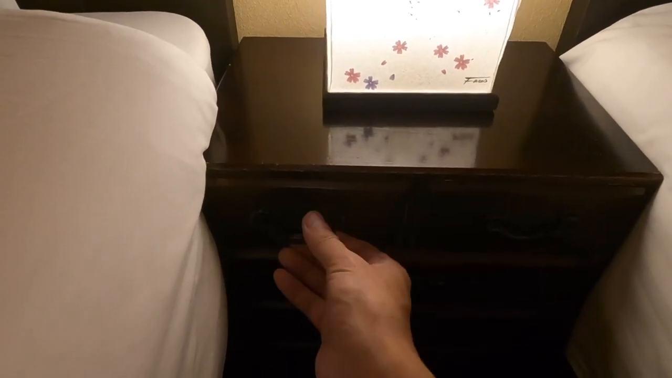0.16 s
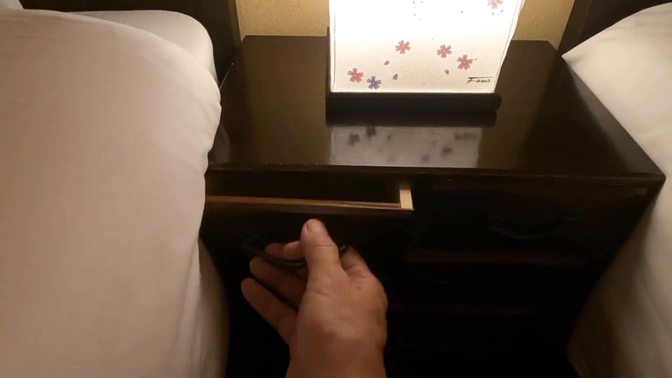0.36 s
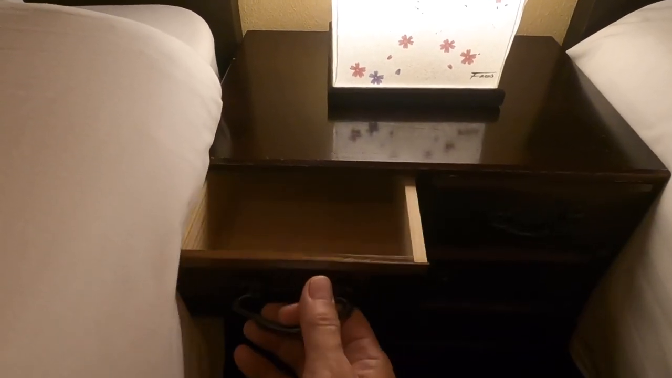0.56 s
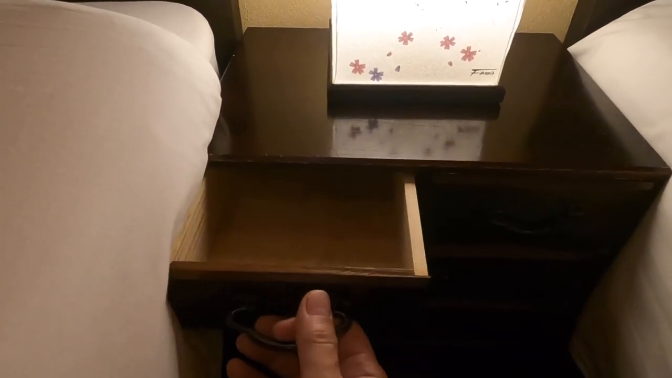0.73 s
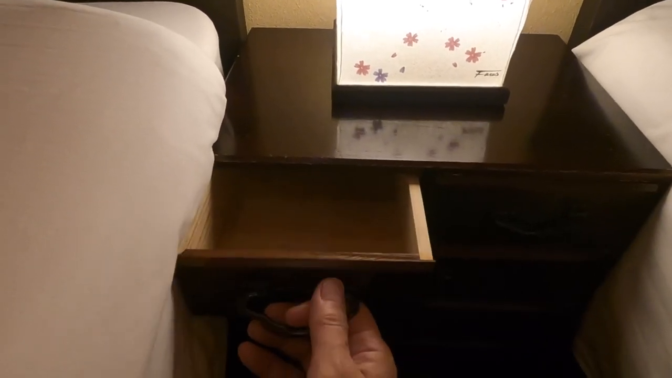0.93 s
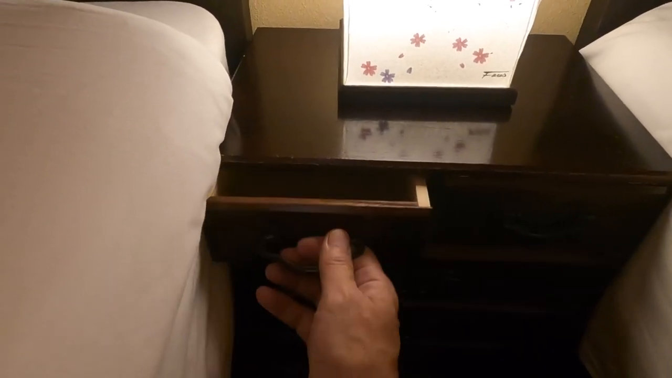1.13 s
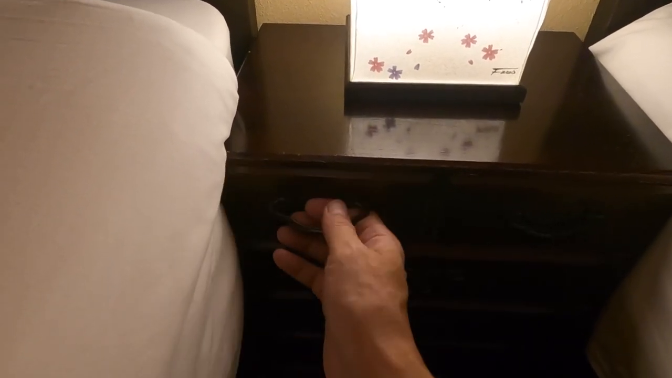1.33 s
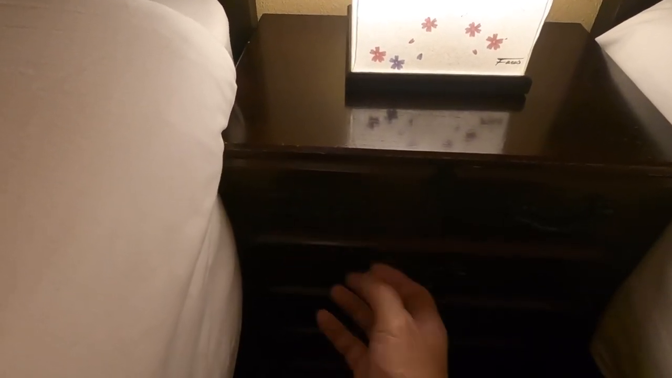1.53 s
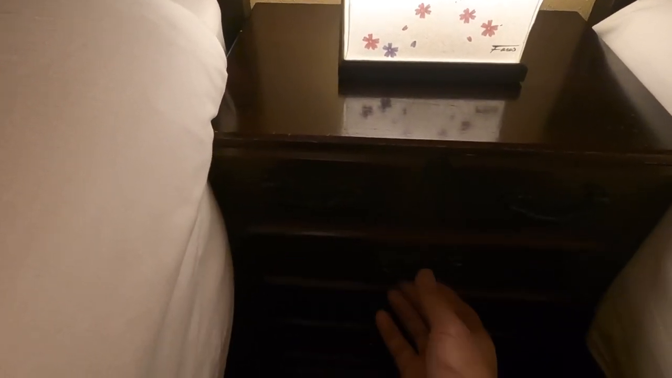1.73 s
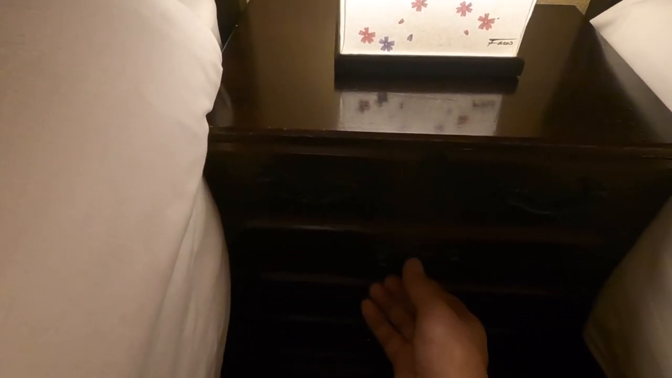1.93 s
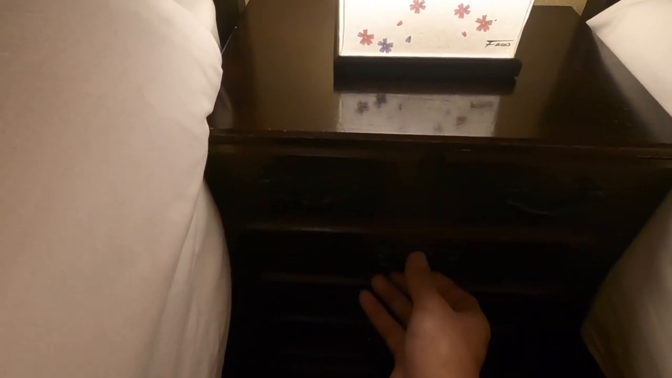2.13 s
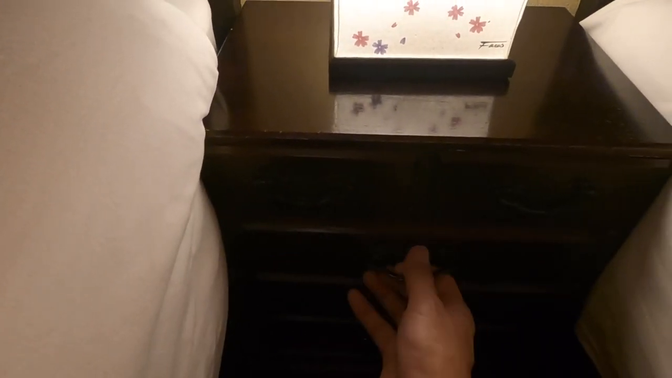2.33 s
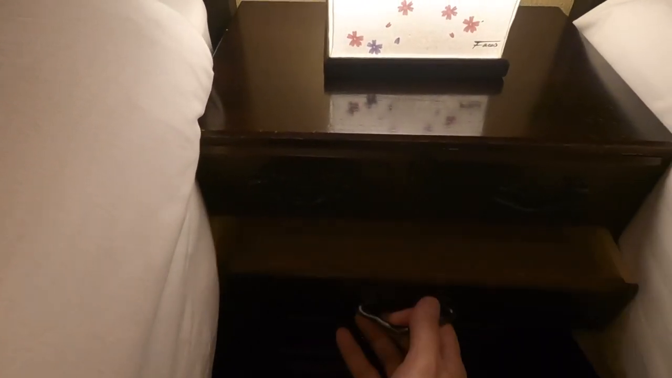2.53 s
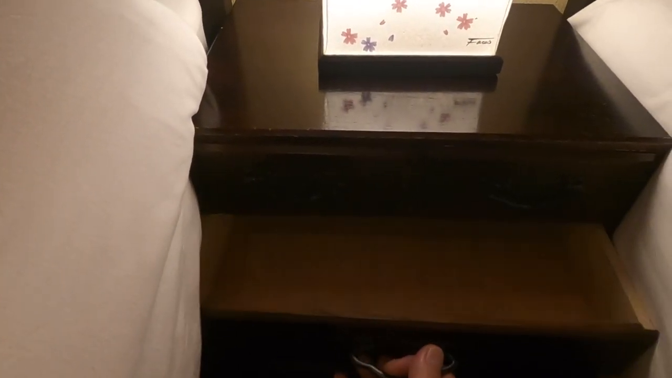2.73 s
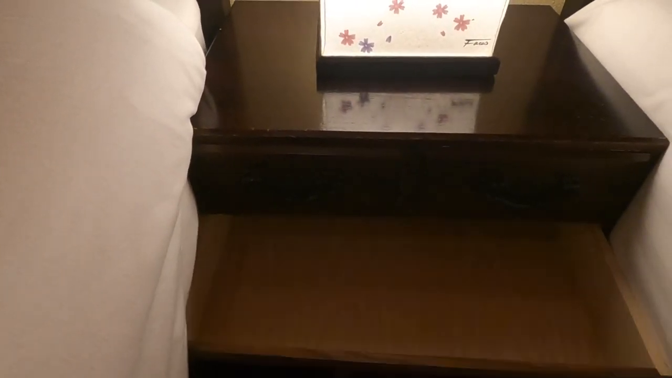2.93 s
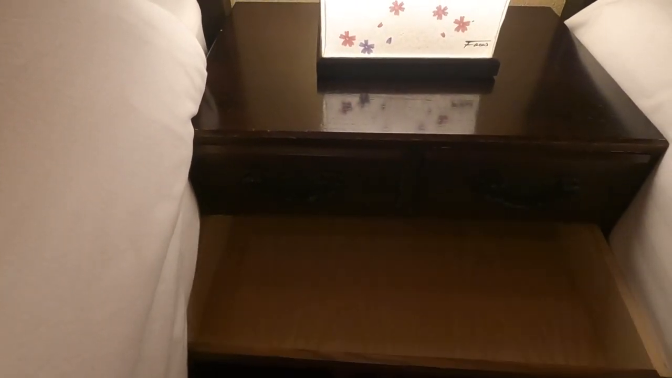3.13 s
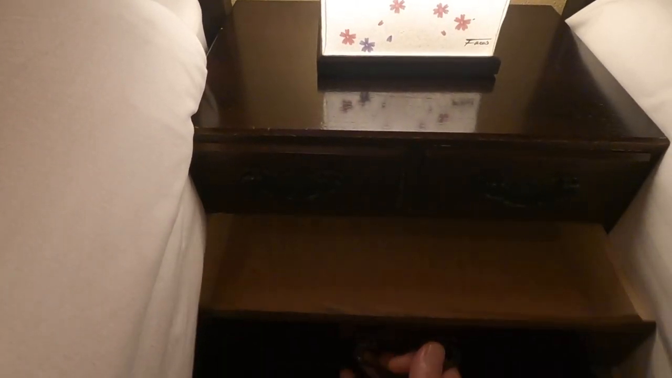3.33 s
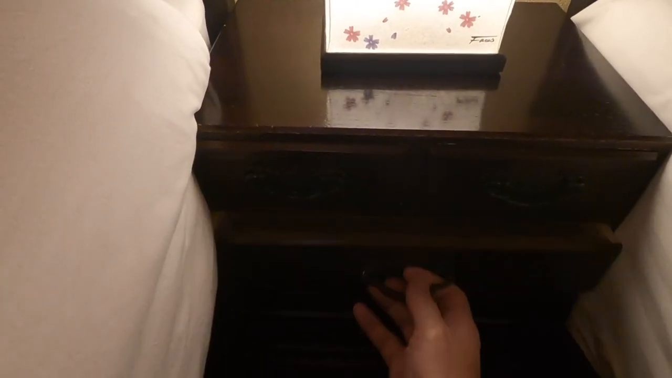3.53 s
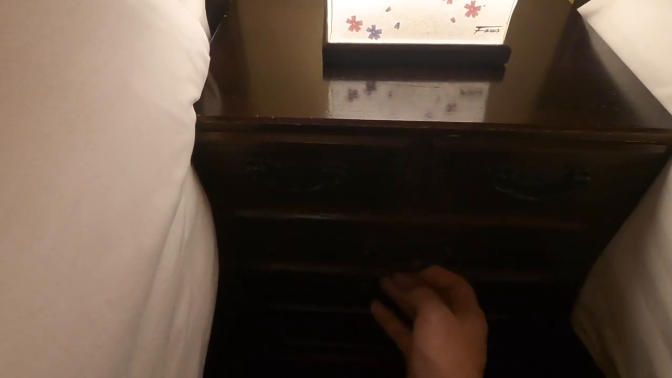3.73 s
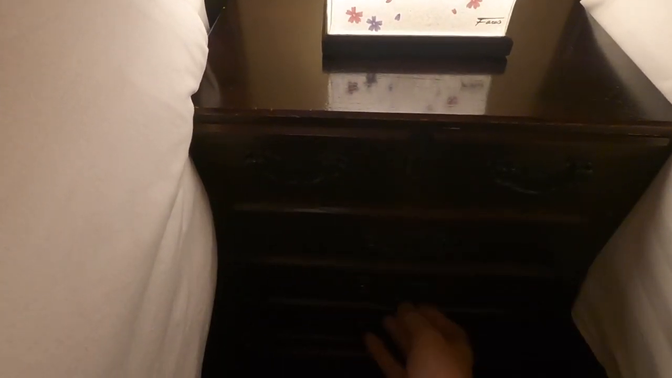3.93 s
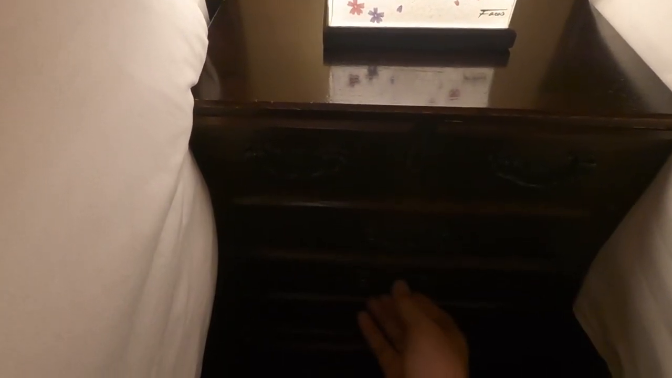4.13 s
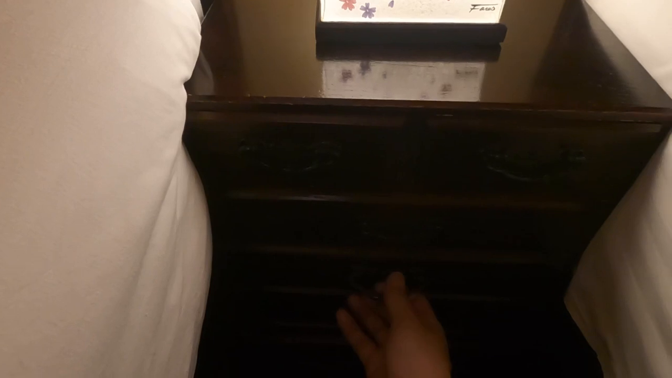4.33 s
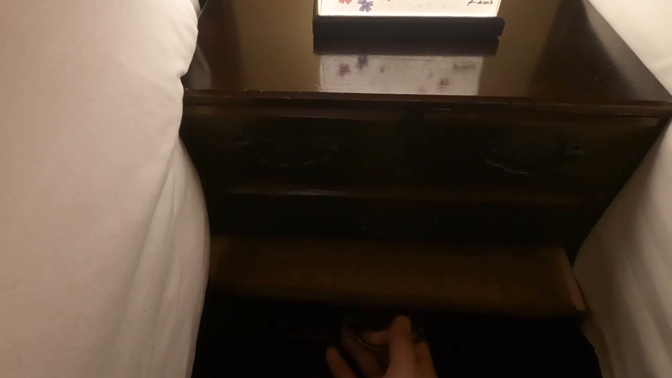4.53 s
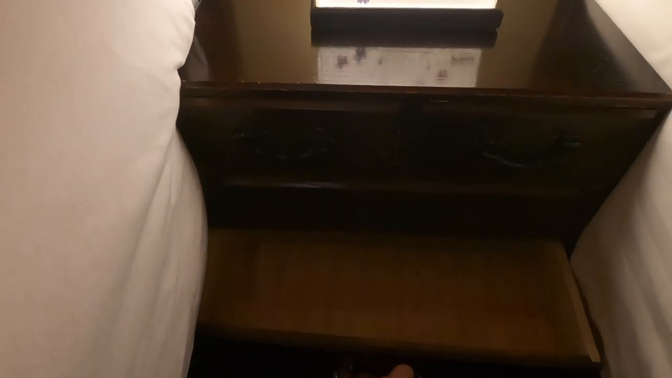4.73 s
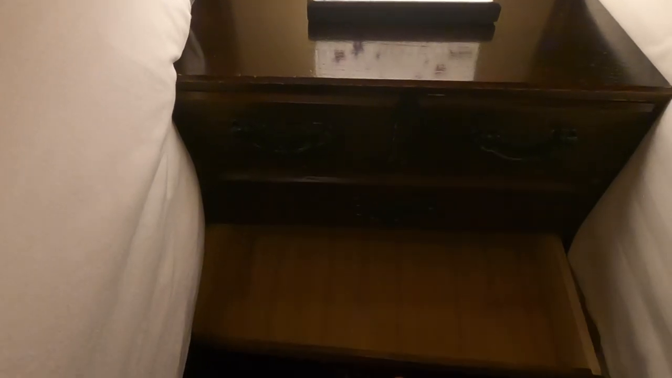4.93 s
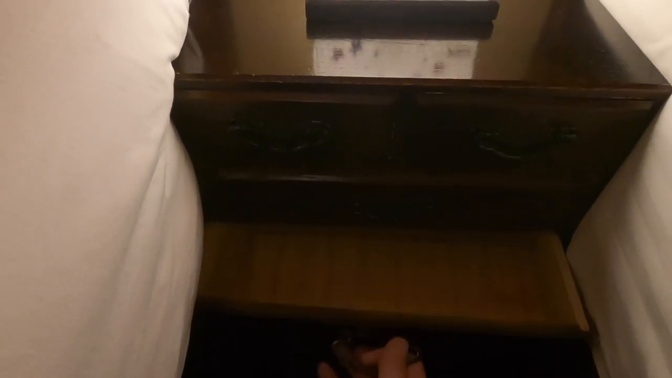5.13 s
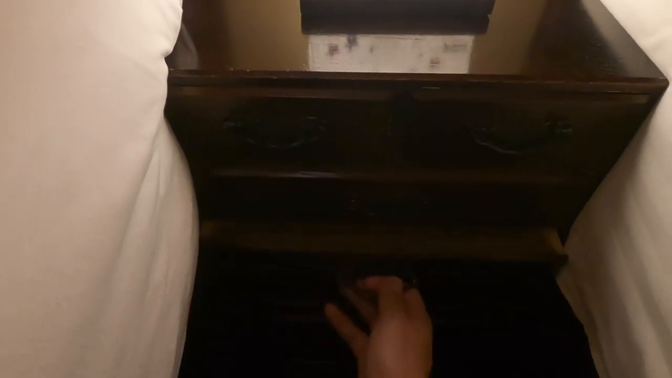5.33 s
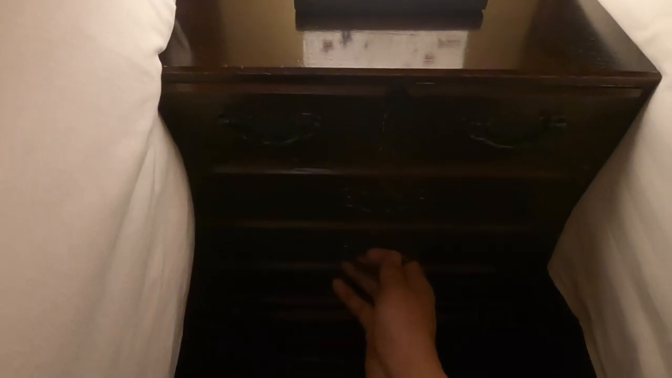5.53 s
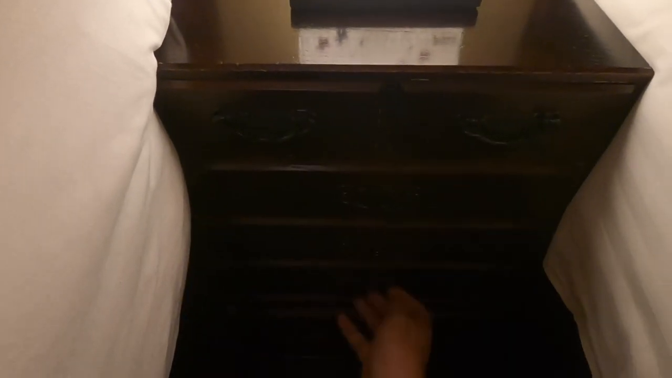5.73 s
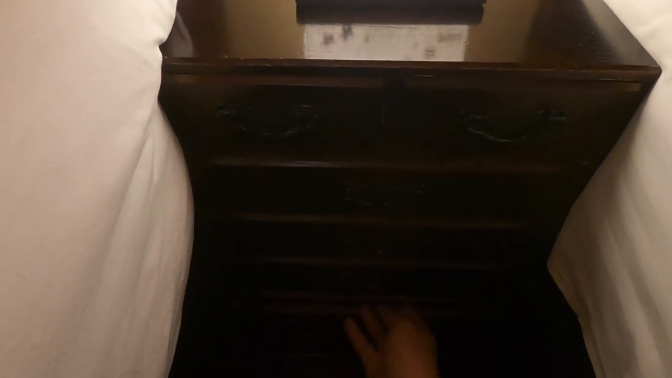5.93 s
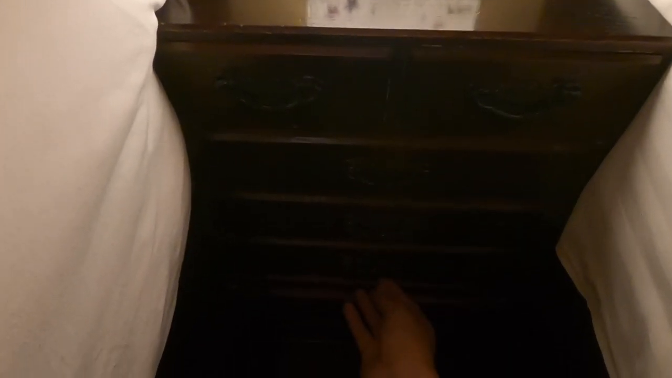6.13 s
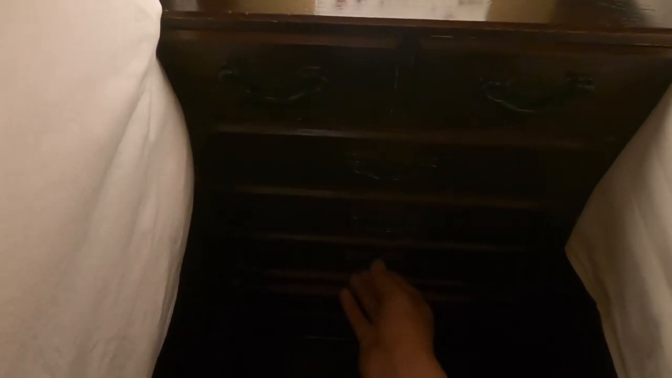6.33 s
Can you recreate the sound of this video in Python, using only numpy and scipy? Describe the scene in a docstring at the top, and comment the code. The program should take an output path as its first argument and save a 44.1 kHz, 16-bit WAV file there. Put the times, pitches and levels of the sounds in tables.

```python
"""Three wooden drawers of a bedside chest, close to the microphone, slide out and in, one after another.
Grain slipping on wooden runners shakes the boxes; wood sticks in short creaks, groans and a falling squeak.
Struck wood and drawer floors thud and knock as dying modes; metal bail handles crack, clatter and ring.
Fingers and a sleeve scuff as clumped sprays of tiny slips.
A small, soft, quiet room answers briefly, over still air and a faint unsteady rumble."""
import sys
import numpy as np
from scipy import signal
from scipy.fft import rfft, irfft, next_fast_len
from scipy.io import wavfile
from scipy.ndimage import uniform_filter1d, map_coordinates

SR = 44100
rng = np.random.default_rng(int(sys.argv[2]) if len(sys.argv) > 2 else 0)


def inscribe(sig):
    """Save sig as 16-bit PCM at rate SR to the path in sys.argv[1].

    A 1-D sig is mono; a 2-D sig holds one channel per row.
    Samples are clipped to [-1, 1] before scaling.
    """
    pcm = np.round(np.clip(np.atleast_2d(sig).T, -1, 1) * 32767)
    wavfile.write(sys.argv[1], SR, pcm.astype(np.int16))


N = 285327
TIME = np.arange(N) / SR  # s

# Still air of the room, relative spectrum: [f/Hz, density/dB per Hz]
AIR = [(10, -3), (29, 10.5), (45, -4), (250, -12.5), (500, -29), (2000, -35.5), (7000, -43.5), (10000, -54),
       (13000, -54), (15000, -102)]
# Faint low rumble, relative spectrum: [f/Hz, density/dB per Hz]
HANDLING_COLOUR = [(30, -13), (70, 14.5), (120, -5), (220, 0), (350, -5.5), (700, -38), (2000, -54)]
AIR_DB, HANDLING_DB = -53, -62  # the rumble wavers about its level
# Decay of the room's tail: [f/Hz, t60/s]
ROOM_T60 = [(100, 0.27), (500, 0.46), (2000, 0.45), (6000, 0.33), (12000, 0.37)]

# Gain of the difference between the two microphone ports: [f/Hz, gain/dB]
WIDTH = [(60, -21), (150, -15), (400, -4), (2000, 2), (5000, 0), (9000, 6)]
# Balance of the ports: [f/Hz, left minus right/dB]
LEAN = [(150, 0), (280, -1.2), (600, -2.1), (1800, -1.8), (4500, -.4), (10000, -.8)]
# Phase between the ports: [f/Hz, lead of the left/rad]
LEAD = [(170, 0), (600, .24), (1400, .27), (3200, -.4), (8000, -.45), (12000, -.1)]
EDGE_HZ = 15200  # top of the band

# Short rubs of fingers, sleeve, handles and loose wood:
# [t/s, length/s, level/dB, centre f/Hz, spread/octaves]
SCUFFS = [(0.0, 0.072, -44.5, 250, 1.8), (1.515, 0.048, -37, 1300, 0.46), (1.78, 0.12, -52, 600, 2.9),
          (1.898, 0.05, -53, 3500, 2.4), (1.962, 0.038, -35, 1300, 1.2), (2.048, 0.035, -51.5, 4250, 1.2),
          (2.068, 0.034, -39.5, 880, 1.47), (2.381, 0.044, -30, 1700, 1.05),
          (3.267, 0.023, -41, 1600, 0.76), (3.573, 0.084, -39, 2500, 0.95), (5.625, 0.12, -46.5, 1200, 1.1),
          (5.872, 1, -64, 2720, 2.6), (5.968, 0.086, -53, 280, 0.85), (6.115, 0.064, -47.5, 2050, 1.34),
          (6.16, 0.082, -53.5, 332, 0.93), (6.222, 0.073, -61.5, 2470, 1.8)]
SCUFF_RISE, SCUFF_FADE_DB = 0.16, -19.5  # build-up as a share of the length; fall over one length

# Dry snaps of a handle's pivot: [t/s, level of the first 2.5 ms/dB, centre f/Hz, spread/octaves]
SNAPS = [(0.5628, -28.5, 3060, 1.5), (1.517, -42.5, 5500, 0.31), (1.6143, -23.5, 4400, 0.84),
         (3.887, -32, 6300, 0.6), (3.894, -31.5, 6000, 0.62), (4.4612, -35, 7100, 0.17),
         (5.5415, -28, 2600, 0.61), (6.41, -51, 4800, 1.7)]
# Modes of a bail handle on its plate, before grip and damping: [f/Hz, level/dB, t60/s]
BAIL = [(871, -3.5, 0.14), (1091, -3, 0.11), (1300, -7.5, 0.085), (1600, 2, 0.064), (1910, 10, 0.019),
        (2630, -20, 0.03), (3770, -10.5, 0.081)]
# Clacks of the handles:
# [t/s, reference level/dB, treble against it/dB, ring of the struck spot f/Hz, number of strikes]
CLACKS = [(0.103, -35.5, -22, 1450, 1), (0.21, -22.5, -14.5, 1330, 1), (0.245, -28.5, -23, 1660, 1),
          (0.3, -30, -20, 1640, 1), (0.315, -20.5, -16, 1610, 1), (0.326, -27.5, -23, 1600, 1),
          (0.333, -26, -24, 1100, 1), (0.341, -21, -16.5, 1630, 1), (0.368, -24, -15, 1800, 1),
          (1, -19, -20, 1680, 1), (1.356, -24.5, -10, 1710, 2), (1.463, -25, -16, 1600, 1),
          (1.526, -25, -21, 1192, 1), (1.553, -39.5, -22.5, 1300, 1), (1.614, -27.5, -18.5, 1300, 1),
          (1.763, -41.5, -20, 1680, 1), (1.956, -28, -16.5, 1690, 2), (2.178, -41, -23, 1660, 1),
          (2.228, -22.5, -13, 1600, 1), (2.3495, -22, -9, 1360, 1), (2.358, -19.5, -19, 1730, 1),
          (2.368, -20.5, -14, 2270, 1), (2.398, -29, -29.5, 980, 1), (2.454, -28.5, -18, 1770, 1),
          (3.421, -29.5, -11.5, 1670, 1), (3.49, -24, -20, 1980, 1), (3.558, -27.5, -32, 1680, 1),
          (3.694, -18, -15.5, 2630, 3), (3.786, -25.5, -17.5, 1840, 1), (3.884, -27, -21.5, 1700, 1),
          (4.094, -41.5, -22.5, 1680, 1), (4.141, -42, -15, 1360, 2), (4.259, -26.5, -17, 1810, 1),
          (4.322, -24, -11.5, 2350, 2), (4.332, -22, -26, 2160, 1), (4.395, -21, -16, 1740, 1),
          (4.463, -26, -12, 1550, 1), (5.014, -42, -24.5, 1120, 1), (5.5407, -19, -17.5, 1570, 1),
          (5.66, -28, -26, 1220, 1), (5.802, -35.5, -17.5, 1680, 1), (6.316, -48, -14, 1300, 1)]
# Clatter of a clack, relative spectrum: [f/Hz, density/dB per Hz]
CLACK_COLOUR = [(300, 9), (700, 0.5), (900, 14), (1600, 6.5), (2700, -1.5), (3700, -5), (5200, -10),
                (7500, -13.5), (9000, -24), (12000, -31), (15000, -60)]
CLACK_T60_S, CLACK_SHORTENING_PER_DB = 0.059, 0.1384  # the brighter the hit, the shorter its clatter
REBOUND_S, REBOUND_DB = 0.0187, -0.5  # a swinging bail strikes again, each time weaker

# Modes of a drawer's thin floor, before tilt and chance detuning: [f/Hz, level/dB, t60/s]
PANEL = [(210, -11.5, 0.11), (478, 3, 0.083), (562.5, -1, 0.1), (927, 2, 0.047), (1034, -4.5, 0.047),
         (1670, -18, 0.055), (2050, -22, 0.071)]
# A drawer tips or catches on its stop: [t/s, level of the first 25 ms/dB, tilt/dB per octave]
CATCHES = [(0.4714, -30.5, 1.5), (0.5, -34, 7), (0.9958, -30.5, -1), (2.931, -32.5, -8.5),
           (4.601, -31.5, 7.5), (4.8573, -25.5, 1)]
# Modes of the chest and its panels, before blow, detuning and ring factor: [f/Hz, level/dB, t60/s]
WOOD = [(68.9, 1.5, 0.51), (79.7, 1.5, 0.21), (93.2, 3.5, 0.24), (111.4, -1.5, 0.3), (140.4, -2.5, 0.097),
        (182.8, 5.5, 0.18), (220, 0.5, 0.15), (247.4, -7.5, 0.11), (287, 0, 0.18), (337.1, -5.5, 0.25),
        (400, -9, 0.12), (470.3, -3, 0.076), (518, -10.5, 0.048), (586.7, -13.5, 0.15), (670, -21.5, 0.22),
        (890, 4.5, 0.036), (921, 2, 0.048), (1050, 2, 0.032), (1234, -2, 0.08), (1480, 5, 0.02),
        (1680, -1, 0.1), (2410, -11.5, 0.035), (3400, -6, 0.03)]
# Wood strikes wood, then the drawer's weight lands: [t/s, strike level/dB, strike f/Hz,
# strike spread/octaves, thud level/dB, thud f/Hz, ring of the thud/factor on t60]
KNOCKS = [(0.102, -43.5, 228, 1.3, -41.5, 123, 0.73), (0.222, -38, 276, 2.1, -38, 111, 3),
          (0.275, -47, 200, 1.3, -41, 118, 1.8), (0.996, -28, 490, 0.71, -30, 119, 0.59),
          (1.119, -41, 250, 1.6, -39.5, 127, 0.78), (1.352, -24.5, 417, 2.04, -25.5, 98, 1.14),
          (1.366, -28, 600, 1.3, -30, 201, 0.8), (1.394, -38.5, 344, 1.2, -30.5, 79.5, 1.17),
          (1.447, -38, 430, 1.45, -36.5, 127, 0.64), (1.617, -47, 330, 1.2, -52, 220, 1.2),
          (1.898, -46.5, 286, 0.69, -38, 206, 1.4), (1.95, -28, 328, 1.67, -25.5, 170, 0.82),
          (1.975, -31, 400, 1.1, -36, 70, 2.3), (2.076, -27, 219, 0.76, -34, 67.3, 1.7),
          (2.253, -36, 210, 1.37, -40.5, 114.4, 6.5), (2.367, -21, 238, 2.64, -29, 84, 0.97),
          (2.391, -30.5, 500, 1.2, -25.5, 190, 1.33), (2.423, -34, 300, 0.79, -34, 132, 1),
          (2.534, -28, 564, 1.34, -28.5, 267.7, 0.97), (2.55, -30.5, 560, 1.14, -38, 226, 0.71),
          (2.942, -28.5, 428, 0.46, -36, 147, 1.3), (3.55, -28, 504, 1.3, -30, 176, 4),
          (3.569, -32, 237, 1, -25.5, 80, 1.08), (3.589, -33.5, 420, 1.5, -39, 128, 1.3),
          (3.651, -38.5, 298, 1.9, -37, 150, 1.2), (3.692, -30, 262, 0.58, -21, 85.5, 0.83),
          (3.713, -33, 600, 1.3, -31, 149.6, 1.3), (3.745, -33.5, 228, 0.65, -47, 83.5, 0.8),
          (4.35, -37.5, 225, 1.6, -41.5, 148, 3.1), (4.6, -22.5, 296, 0.92, -37, 220, 0.7),
          (4.885, -36.5, 298, 1.04, -35.5, 170, 1.56), (5.517, -36.5, 1390, 1.2, -40, 230, 1.1),
          (5.528, -34.5, 270, 1.3, -22, 80, 0.55), (5.65, -46.5, 305, 1.5, -29.5, 113, 1.07),
          (5.943, -61.5, 600, 1.1, -59, 202, 1), (6.412, -54.5, 227, 0.64, -48, 130, 0.61)]
LANDING_S, STRIKE_RING, THUD_SPREAD_OCTAVES = 0.00809, 1, 0.5

# The bottom drawer wedges shut with a falling squeak:
# [t/s, pitch before a chance offset f/Hz, level/dB]
SQUEAK = [(5.511, 2164, -30), (5.513, 1810, -31), (5.518, 1050, -30), (5.522, 704, -25),
          (5.533, 647, -29.5)]
# Creaks, groans and chirps of sticking wood: [t/s, length/s, slip rate at the start/per s,
# slip rate at the end/per s, level/dB, brightness f/Hz]
CREAKS = [(0.383, 0.11, 146, 134, -34.5, 152), (0.448, 0.021, 180, 170, -40, 600),
          (0.471, 0.052, 106, 132, -29.5, 148), (0.499, 0.022, 314, 265, -32.5, 1130),
          (0.506, 0.029, 256, 170, -26, 360), (3.304, 0.037, 1380, 1370, -36, 1370),
          (3.325, 0.018, 400, 420, -31, 430), (3.354, 0.0186, 450, 475, -29, 600),
          (3.413, 0.047, 495, 430, -34.5, 445), (4.536, 0.021, 1700, 1260, -40, 1700),
          (4.606, 0.037, 208, 174, -36, 255)]
# A drawer skews and binds on its runners: [t/s, rise/s, length/s, release/s,
# mean extra scrape when fully bound/dB, level of its jerks before scatter/dB]
BINDS = [(2.931, 0.0049, 0.019, 0.028, 9, -40.5), (3.277, 0.037, 0.14, 0.011, 8, -40.5),
         (3.542, 0.0025, 0.038, 0.046, 2.5, -40), (4.512, 0.095, 0.09, 0.0074, 6, -52)]
BIND_GRIT, BIND_RUMBLE = 0.18, 0.29  # of a bind's added dB: share that flutters; share in the rumble
JERKS_PER_S, JERK_HZ, JERK_SCATTER_OCTAVES = 72, 666, 0.91
JOLTS_PER_S, JOLT_HZ, JOLT_DB = 11, 170, -4.5  # bumps in the runners; level against the rumble

# Out then in for each drawer; levels at full speed, before binding, easing and judder:
# [start t/s, up to speed t/s, slows t/s, rests t/s, hiss of the runners level/dB,
# rasp of the box level/dB, rumble level/dB, easing of the load over the run/dB]
STROKES = [(0.30, 0.51, 0.72, 0.8, -44.5, -39, -36, 6), (0.909, 1.049, 1.33, 1.386, -48.5, -44, -44, 3),
           (2.41, 2.565, 3.025, 3.1, -48.3, -49.5, -51, 0),
           (3.205, 3.273, 3.48, 3.964, -47, -43.5, -49.5, 0.5),
           (4.409, 4.547, 4.775, 5.053, -43.5, -40.5, -39, 4),
           (5.027, 5.281, 5.52, 5.56, -44, -40, -52.5, 7)]
# Scrape of the top drawer, relative spectrum: [f/Hz, density/dB per Hz]
SCRAPE_TOP = [(35, -39), (60, -8), (102, 5.5), (155, -13), (214, -5), (355, -2.5), (448, -4.5), (744, -5),
              (1050, -14), (1750, -21), (5820, -26.5), (11900, -47), (15000, -63)]
# Scrape of the middle drawer on the way out, relative spectrum: [f/Hz, density/dB per Hz]
SCRAPE_MIDDLE = [(35, -9), (60, 7.5), (170, -9), (204, 4), (246, -15), (469, 10), (711, 3.5), (960, 6),
                 (1600, -8), (1880, -12.5), (3580, -15), (11900, -40.5), (15000, -65)]
# Scrape of the middle drawer as it binds on the way in, relative spectrum: [f/Hz, density/dB per Hz]
SCRAPE_BINDING = [(35, -49), (60, -6), (162, -4), (251, -19), (458, -7), (762, -7.5), (916, -32),
                  (1010, -15), (1710, -23), (2150, -24), (2360, -17), (2600, -28), (2850, -17), (4500, -19),
                  (5500, -20), (6500, -26.5), (12200, -41.5), (15000, -62)]
# Scrape of the bottom drawer, relative spectrum: [f/Hz, density/dB per Hz]
SCRAPE_BOTTOM = [(35, -43), (60, 12), (148, -3), (224, -5.5), (418, -2.5), (564, 4.5), (711, -10.5),
                 (916, -1), (2060, -23.5), (3660, -23), (7500, -38), (12500, -52.5), (15000, -76.5)]
# Resonances of the top drawer's box, relative levels before drift: [f/Hz, width/Hz, level/dB]
BOX_TOP = [(460, 71, 6.5), (1170, 480, -4)]
# Resonances of the middle drawer's box, likewise: [f/Hz, width/Hz, level/dB]
BOX_MIDDLE = [(439, 125, 3.5), (940, 30, -3), (1460, 70, -6), (1690, 50, -6), (2360, 100, -9.5),
              (3570, 230, -20), (5330, 1000, -16)]
# Resonances of the bottom drawer's box, likewise: [f/Hz, width/Hz, level/dB]
BOX_BOTTOM = [(213.5, 22, 10), (600, 71, 4), (930, 19, 6), (1550, 240, -7), (2384, 130, -11.5),
              (3500, 170, -16.5), (5530, 1500, -26.5)]
SPEED_DB_PER_DECADE = 29  # the scrape grows with the speed of the drawer
RASP_EASING, RUMBLE_EASING = 1.63, 1.1  # the box feels the easing load more than the runners do


def amp(db):
    """Decibels to gain."""
    return 10 ** (np.asarray(db) / 20)


def unit(x):
    """Scales to rms 1."""
    return x / np.sqrt(np.mean(x ** 2) + 1e-20)


def read(points, hz):
    """Reads a table on a log-frequency axis."""
    f, value = np.transpose(points)
    return np.interp(np.log(hz + 1), np.log(f + 1), value)


def swell(s, db):
    """Gain along a level curve, fading to -120 dB outside it."""
    return amp(np.interp(TIME, np.r_[s[0] - .02, s, s[-1] + .03], np.r_[-120, db, -120]))


def shape(x, gain):
    """Filters by a gain given as a function of frequency."""
    size = next_fast_len(x.shape[-1] + 2048)
    spectrum = rfft(x, size) * gain(np.fft.rfftfreq(size, 1 / SR))
    return irfft(spectrum, size)[..., :x.shape[-1]]


def below(hz, edge_hz, order=8):
    """Low-pass gain."""
    return 1 / np.sqrt(1 + (hz / edge_hz) ** order)


def above(hz, edge_hz):
    """The matching high-pass gain."""
    return np.sqrt(1 - below(hz, edge_hz) ** 2)


def noise(colour, count=N):
    """Noise of a given spectrum at rms 1."""
    return unit(shape(rng.standard_normal(count), lambda hz: amp(read(colour, hz))))


def waver(per_s):
    """Slow chance at rms 1: straight lines between 4096 random knots, then the last one held."""
    knots = rng.standard_normal(4096)
    return unit(np.interp(TIME * per_s, np.arange(len(knots)), knots))


def add(mix, s, sound):
    """Mixes a sound in at a time."""
    part = mix[max(round(s * SR), 0):][:len(sound)]
    part += sound[:len(part)]


def scattered(start, length, per_s):
    """Unevenly spaced moments, at most 24, each with two chance values: rows (s, chance, chance)."""
    draws = rng.random((24, 3))
    s = start + (np.arange(len(draws)) + draws[:, 0]) / per_s
    return np.c_[s, 2 * draws[:, 1:] - 1][s < start + length]


def ring(modes, t, weight=1, hold=1, in_step_hz=330):
    """Dying sines: each blow lands on another spot, so high modes differ in phase, the lowest less."""
    hz, db, t60 = np.transpose(modes)[:, :, None]
    phase = rng.random() + rng.uniform(-0.55, 0.54, hz.shape) * np.minimum(hz / in_step_hz, 1)
    decay = amp(db - 60 * t / (t60 * hold))
    return (weight * decay * np.sin(2 * np.pi * (hz * t + phase))).sum(0)


def grain(grain_db, clump_db, clumps_per_s):
    """Countless tiny slips of random force, gathered in clumps."""
    slips = rng.standard_normal(N)
    force_db = grain_db * np.minimum(rng.exponential(1, N), 5)
    return slips * amp(force_db + clump_db * waver(clumps_per_s))


def patches(x, patchy_db, patch_s=0.0446, patch_hz=260):
    """The point of contact moves, so different resonances speak from moment to moment."""
    z = signal.stft(x, nperseg=512, noverlap=384)[2]
    frame_s = np.arange(z.shape[1]) * 128 / SR
    hz, s = np.meshgrid(np.fft.rfftfreq(512, 1 / SR), frame_s, indexing="ij")
    knots = rng.standard_normal((256, 64))
    field = map_coordinates(knots, [hz / patch_hz, s / patch_s], order=1, mode="mirror")
    return signal.istft(z * amp(patchy_db * field), nperseg=512, noverlap=384)[1][:len(x)]


def background(diffuse=0.66, unsteady_db=4):
    """Still air, partly opposed between the two sides, and a soft central rumble that wavers."""
    sides = np.array([[1], [-1]])
    air = amp(AIR_DB) * (noise(AIR) + diffuse * sides * noise(AIR))
    return air + noise(HANDLING_COLOUR) * amp(HANDLING_DB + unsteady_db * waver(6))


def room(x, early_db=-14, tail_db=-16):
    """Quick reflections off the chest and the beds, then a faint tail; each side hears its own."""
    t = np.arange(SR // 2) / SR
    early_t60 = .09
    out = x
    # the pattern of echoes keeps changing: two patterns take turns
    turn = 2 * np.pi * TIME
    for share in (np.sin(turn), np.cos(turn)):
        early, late = rng.standard_normal((2, 2, len(t)))
        early *= amp(-60 * t / early_t60) * (t > .001) * (rng.random(early.shape) < .1)
        hz, at, z = signal.stft(late * (t > .008), SR, nperseg=256)
        decay = amp(-60 * at / read(ROOM_T60, hz)[:, None])
        tail = signal.istft(z * decay, SR, nperseg=256)[1][:, :len(t)]
        echo = amp(early_db) * early / np.linalg.norm(early[0])
        echo = echo + amp(tail_db) * tail / np.linalg.norm(tail[0])
        out = out + signal.fftconvolve((x * share)[None], echo, axes=1)[:, :N]
    return out


def scuffs(grain_db=3.0, clump_db=1.5, clumps_per_s=260, patchy_db=3.5, top_hz=7200):
    """A rub is a clumped spray of tiny slips that builds quickly and trails off."""
    slips = patches(grain(grain_db, clump_db, clumps_per_s), patchy_db)
    out = np.zeros(N)
    for s, length, db, centre_hz, spread in SCUFFS:
        def colour(hz):
            octaves = np.log2((hz + 1) / centre_hz)
            return below(hz, top_hz, order=12) / (1 + (octaves / spread) ** 2) ** 2

        rub = shape(slips[max(round(s * SR), 0):][:round(2 * length * SR)], colour)
        age = np.arange(len(rub)) / (length * SR)  # in lengths
        build = np.minimum(age / SCUFF_RISE, 1)
        fade = amp(db + SCUFF_FADE_DB * np.maximum(age - SCUFF_RISE, 0)) * np.minimum(2 - age, 1)
        add(out, s, unit(rub) * build * fade)
    return out


def snaps(crack_s=0.00048, rattle_db=-9, rattle_t60=0.033, top_hz=7600, bottom_hz=700):
    """A handle's pivot gives a sharp crack and a few milliseconds of rattle, with no ring."""
    out = np.zeros(N)
    t = np.arange(SR // 10) / SR
    for s, db, centre_hz, spread in SNAPS:
        def colour(hz):
            peak = 1 / (1 + (np.log2((hz + 1) / centre_hz) / spread) ** 2)
            return below(hz, top_hz, order=20) * above(hz, bottom_hz) * peak

        fall = np.exp(-t / crack_s) + amp(rattle_db - 60 * t / rattle_t60)
        burst = shape(rng.standard_normal(len(t)) * fall, colour)
        add(out, s, amp(db) * burst / np.std(burst[:SR // 400]))
    return out


def clack(db, treble_db, t60, spot_hz, body_db=-8, bail_db=-5, spot_db=2,
          rise_s=0.00083, crack_db=4, crack_s=0.00088, treble_hold=0.83, detune=0.0509):
    """Metal hits its plate: a crack, a short clatter and the ring of the bail, retuned by the fingers' grip."""
    t = np.arange(SR // 3) / SR
    t60 = max(t60, .008)
    spot_width = .1  # share of the spot's frequency
    clatter = noise(CLACK_COLOUR, count=len(t))
    clatter = shape(clatter, lambda hz: 1 + amp(spot_db) / (1 + ((hz / spot_hz - 1) / spot_width) ** 2))
    onset = 1 - np.exp(-t / rise_s)
    crack = (1 + amp(crack_db) * np.exp(-t / crack_s)) * onset
    body = unit(shape(clatter, lambda hz: below(hz, 3220))) * amp(-60 * t / t60) * crack
    grip = 1 + detune * rng.standard_normal()
    body += amp(bail_db) * ring(BAIL, t * grip, hold=t60 / 0.053) * onset / 2
    treble = unit(shape(clatter, lambda hz: above(hz, 3720)))
    treble = treble * amp(-60 * t / (t60 * treble_hold)) * crack
    head = slice(0, SR // 200)
    body = amp(body_db) * body / np.std(body[head])
    treble = amp(treble_db) * treble / np.std(treble[head])
    return amp(db) * (body + treble)


def handles(usual_treble_db=-18, dulling_db=-1):
    """A bail hits its plate and may rebound at an even pace, each time duller."""
    out = np.zeros(N)
    for s, db, treble_db, spot_hz, strikes in CLACKS:
        t60 = CLACK_T60_S * np.exp(-CLACK_SHORTENING_PER_DB * (treble_db - usual_treble_db))
        for k in range(round(strikes)):
            hit = clack(db + k * REBOUND_DB, treble_db + k * dulling_db, t60, spot_hz)
            add(out, s + k * REBOUND_S, hit)
    return out


def catches(contact_s=0.00091, detune=0.021):
    """The floor of a tipping or caught drawer rings in a compact, hollow knock."""
    out = np.zeros(N)
    t = np.arange(SR // 4) / SR
    octaves = np.log2(np.array(PANEL)[:, :1] / PANEL[0][0])
    build = 1 - np.exp(-(t / contact_s) ** 2)
    for s, db, tilt_db in CATCHES:
        shift = 1 + detune * rng.standard_normal()
        sound = ring(PANEL, t * shift, amp(tilt_db * octaves)) * build
        add(out, s, amp(db) * sound / np.std(sound[:SR // 40]))
    return out


def knock(db, centre_hz, spread, hold, chatter_db=-6, chatter_t60=0.1, chatter_lift=1.215,
          chatter_top_hz=7500, detune=0.021):
    """A soft blow wakes the low modes, a hard one the high; loose joints chatter briefly."""
    t = np.arange(SR // 2) / SR

    def blow(hz):
        return 1 / (1 + (np.log2((hz + 1) / centre_hz) / spread) ** 2) ** 2

    shift = 1 + detune * rng.standard_normal()  # the chest is tuned by where its drawers stand
    modes = ring(WOOD, t * shift, blow(np.array(WOOD)[:, :1]), hold)
    chatter = rng.standard_normal(len(t))
    chatter = shape(chatter, lambda hz: blow(hz / chatter_lift) * below(hz, chatter_top_hz))
    chatter = chatter * amp(-60 * t / (chatter_t60 * hold))
    head = slice(0, SR // 40)  # levels hold for the first 25 ms
    sound = modes / np.std(modes[head]) + amp(chatter_db) * chatter / np.std(chatter[head])
    contact_s = .0012 + .25 / centre_hz
    sound *= 1 - np.exp(-(t / contact_s) ** 2)  # wood gives, so the force builds up
    return amp(db) * sound / np.std(sound[head])


def bumps():
    """An edge strikes first; a moment later the weight of the box thuds into the chest."""
    out = np.zeros(N)
    for s, strike_db, strike_hz, spread, thud_db, thud_hz, hold in KNOCKS:
        add(out, s, knock(strike_db, strike_hz, spread, STRIKE_RING))
        add(out, s + LANDING_S, knock(thud_db, thud_hz, THUD_SPREAD_OCTAVES, hold))
    return out


def squeak(skip_db=-13, rough=0.22, jitter=.2):
    """Rough stick and slip slows down as the drawer is braked; every other slip is weaker."""
    s, hz, db = np.transpose(SQUEAK)
    # this waver holds still by the time of the squeak: one chance offset of the pitch
    rate = np.interp(TIME, s, hz) * (1 + jitter * waver(900))
    phase = 2 * np.pi * np.cumsum(rate) / SR
    tone = (np.sin(phase) + amp(skip_db) * np.sin(phase / 2)) * (1 + rough * waver(600))
    return tone * swell(s, db)


def creaks(jitter=0.07, uneven_db=3, spread=0.53, hold=0.28, edge_s=0.0042, breakaway_db=4):
    """Each slip is a small, damped knock of the wood, hardest at first, at a gliding, uneven rate."""
    out = np.zeros(N)
    t = np.arange(SR // 8) / SR
    for s, length, first_hz, last_hz, db, centre_hz in CREAKS:
        wobble, force = rng.standard_normal((2, len(t)))
        rate = np.interp(t, [0, length], [first_hz, last_hz])
        rate = rate * (1 + jitter * unit(uniform_filter1d(wobble, size=90)))
        slips = np.diff(np.floor(np.cumsum(rate) / SR), prepend=-1)  # one click per whole cycle
        slips = slips * amp(uneven_db * force + breakaway_db * np.exp(-t / edge_s))
        slips = slips * np.clip((length - t) / edge_s, 0, 1)
        sound = signal.fftconvolve(slips, knock(0, centre_hz, spread, hold))
        add(out, s, amp(db) * sound / np.sqrt(np.sum(sound ** 2) / (length * SR)))
    return out


def jerks(scatter_db=4, spread=1.0, hold=3.0, onset_db=-9):
    """A binding drawer sticks and breaks free in a quick run of small knocks that grow as it wedges."""
    out = np.zeros(N)
    for start, rise, length, _, _, db in BINDS:
        for s, force, place in scattered(start, length, JERKS_PER_S):
            level = db + scatter_db * force + onset_db * max(1 - (s - start) / rise, 0)
            add(out, s, knock(level, JERK_HZ * 2 ** (JERK_SCATTER_OCTAVES * place), spread, hold))
    return out


def jolts(stroke, scatter_db=4, spread=0.77, hold=0.81):
    """The moving box rocks over bumps in its runners."""
    s, _, _, rumble = np.transpose(stroke)
    out = np.zeros(N)
    for at, force, place in scattered(s[0], s[-1] - s[0], JOLTS_PER_S):
        level = np.interp(at, s, rumble) + JOLT_DB + scatter_db * force
        add(out, at, knock(level, JOLT_HZ * 2 ** (place / 2), spread, hold))
    return out


def travel(start, moving, slowing, rest, hiss_db, rasp_db, rumble_db, easing_db):
    """The hand speeds up, holds and brakes; speed and load set the scrape: rows (s, hiss, rasp, rumble)."""
    s = np.linspace(start, rest, 200)
    speeding, braking = (s - start) / (moving - start), (rest - s) / (rest - slowing)
    speed = np.clip(np.minimum(speeding, braking), .01, 1)
    eased = easing_db * np.clip((s - moving) / (slowing - moving), 0, 1)
    binding = sum(db * np.clip((s - at) / rise, 0, 1) * np.exp(-np.maximum(s - at - length, 0) / release)
                  for at, rise, length, release, db, _ in BINDS)
    binding = binding * (1 + BIND_GRIT * rng.standard_normal(len(s)))
    drive = SPEED_DB_PER_DECADE * np.log10(speed)
    hiss = hiss_db + drive + binding - eased
    rasp = rasp_db + drive + binding - RASP_EASING * eased
    rumble = rumble_db + drive + BIND_RUMBLE * binding - RUMBLE_EASING * eased
    return np.c_[s, hiss, rasp, rumble]


def slide(stroke, colour, box, outward, box_db=-3, ripple_db=3, glide=0.0296, grain_db=2.0, judder_db=0.5,
          sheen_db=4, sheen_hz=7100, clump_db=1.0, patchy_db=3.0):
    """Countless small slips of wood grain on the runners shake the drawer's box."""
    s, hiss, rasp, rumble = np.transpose(stroke)
    slips = grain(grain_db, clump_db, 500)
    ripple = rng.standard_normal(256)  # the panels' many weak upper modes

    def body(hz):
        peaks = sum(amp(db + box_db) ** 2 / (1 + (2 * (hz - f) / width) ** 2) ** 2 for f, width, db in box)
        fine = np.interp(hz, np.linspace(0, SR / 2, len(ripple)), np.tanh(ripple))
        sheen = sheen_db * np.exp(-((hz - sheen_hz) / 800) ** 2)  # dry fibres hiss in a broad treble hump
        resonant = np.sqrt(amp(read(colour, hz)) ** 2 + peaks)
        return resonant * amp(sheen + ripple_db * fine * above(hz, 1335))

    near = (TIME > s[0] - .03) & (TIME < s[-1] + .04)
    # the free length of the box changes: its resonances drift down on the way out, up on the way in
    drift = 1 + glide * (-1 if outward else 1) * np.linspace(-.5, .5, near.sum())
    scrape = map_coordinates(shape(slips[near], body), [np.cumsum(drift)], order=3, mode="mirror")
    scrape = patches(scrape, patchy_db)
    judder = judder_db * waver(110)[near]  # the load on the runners keeps shifting
    split_hz = 1900
    bands = [(lambda hz: above(hz, split_hz), hiss, .4),  # gain, level/dB, share of the judder
             (lambda hz: below(hz, split_hz) * above(hz, 150), rasp, 1),
             (lambda hz: below(hz, 269), rumble, 1)]
    out = np.zeros(N)
    for band, db, share in bands:
        out[near] += unit(shape(scrape, band)) * swell(s, db)[near] * amp(share * judder)
    return out


def scene():
    """Each drawer goes out and in, with its knocks and handle clacks, in the room over its still air."""
    colours = [SCRAPE_TOP, SCRAPE_TOP, SCRAPE_MIDDLE, SCRAPE_BINDING, SCRAPE_BOTTOM, SCRAPE_BOTTOM]
    boxes = [BOX_TOP, BOX_MIDDLE, BOX_BOTTOM]
    floor = background()
    strokes = [travel(*row) for row in STROKES]
    scrapes = sum(slide(stroke, colours[k], boxes[k // 2], k % 2 == 0) for k, stroke in enumerate(strokes))
    metal = handles() + snaps()
    sticking = squeak() + creaks() + jerks()
    knocks = bumps() + catches() + sum(map(jolts, strokes))
    return room(scrapes + sticking + knocks + metal + scuffs()) + floor


def record(dry):
    """Two close microphone ports: bass nearly mono, the middle leaning right; then the band limit."""
    def port(hz):
        return amp(read(LEAN, hz) / 2) * np.exp(.5j * read(LEAD, hz))

    mid = dry.mean(0)
    side = shape(dry[0] - mid, lambda hz: amp(read(WIDTH, hz)))
    left, right = shape(mid + side, port), shape(mid - side, lambda hz: 1 / port(hz))
    edge = signal.firwin(511, EDGE_HZ, window=("kaiser", 9), fs=SR)
    return signal.oaconvolve(np.array([left, right]), edge[None], "same", axes=1)


dry = scene()
out = record(dry)
inscribe(out)
```